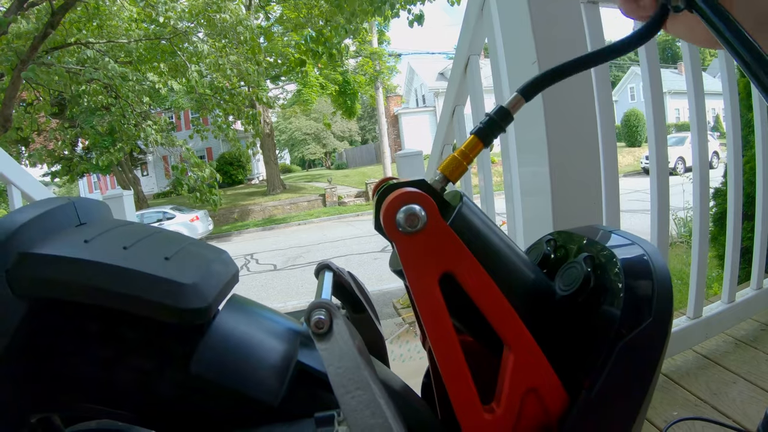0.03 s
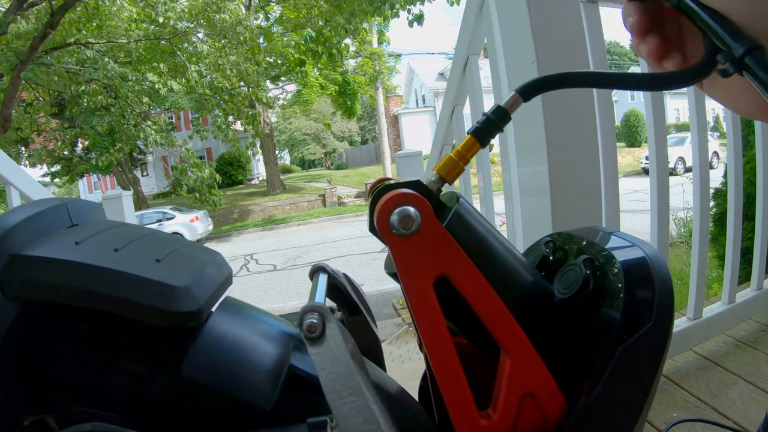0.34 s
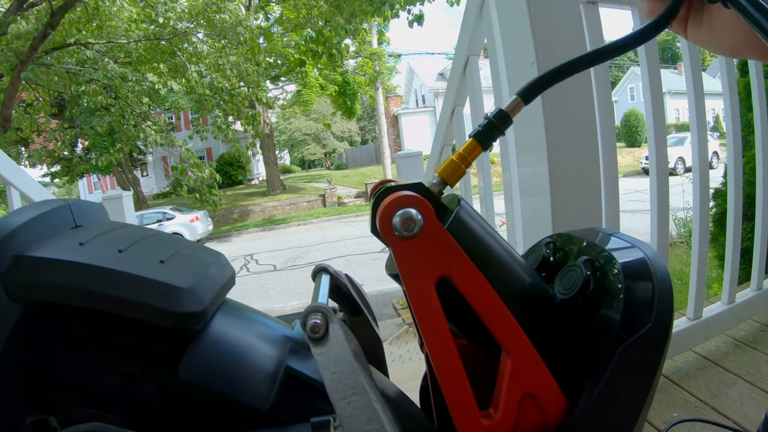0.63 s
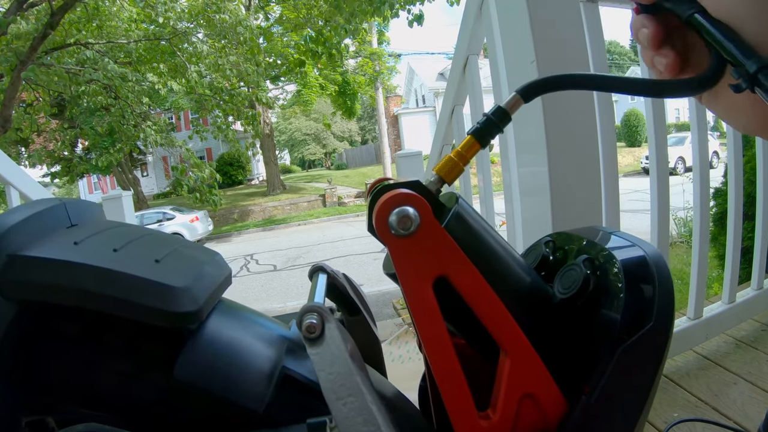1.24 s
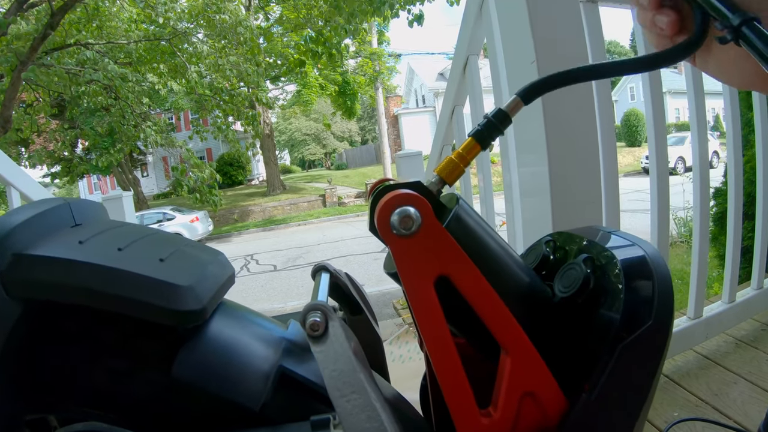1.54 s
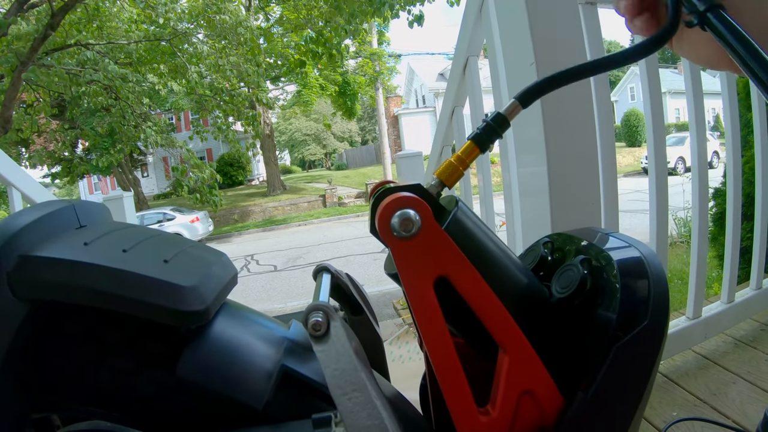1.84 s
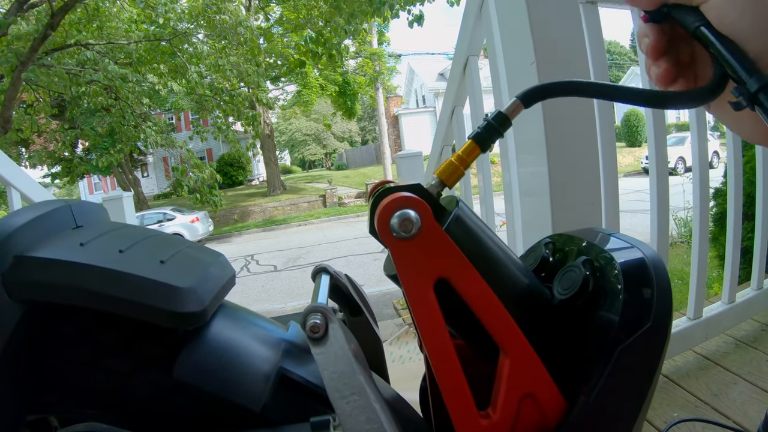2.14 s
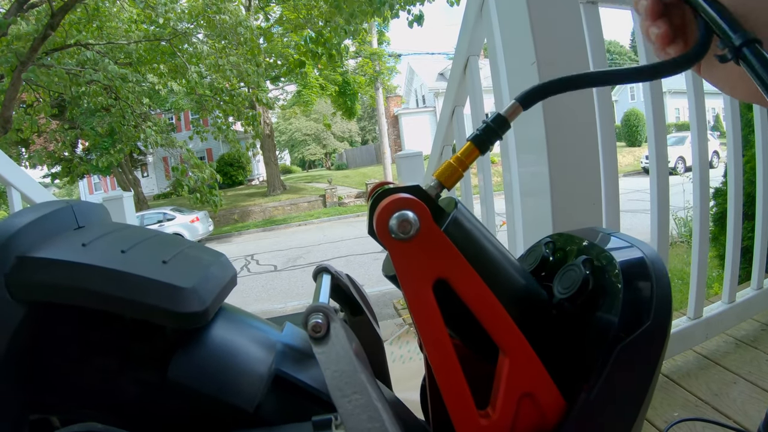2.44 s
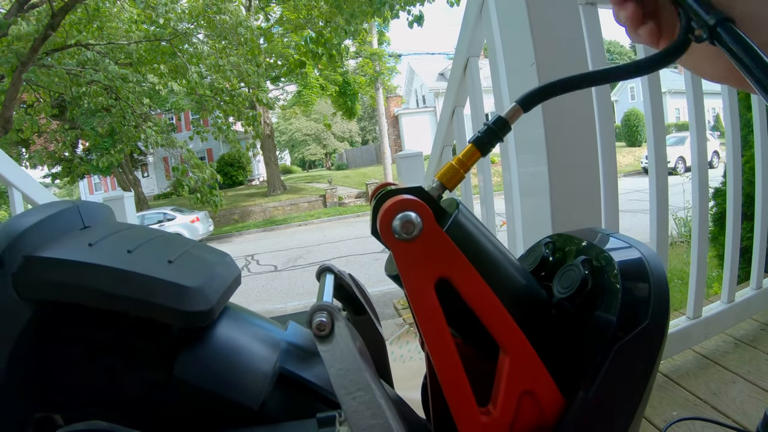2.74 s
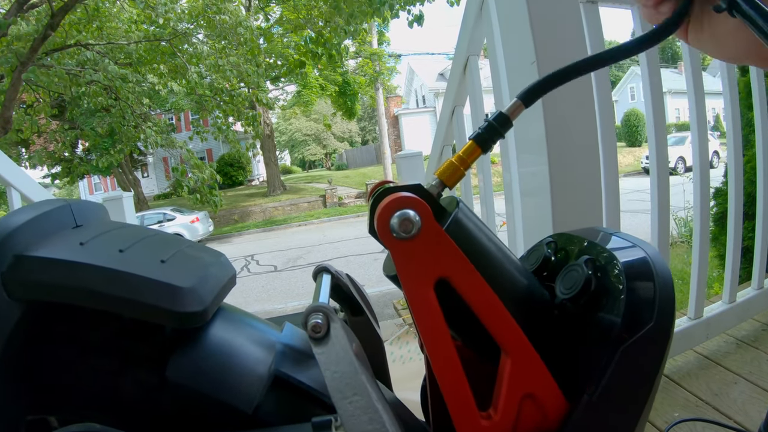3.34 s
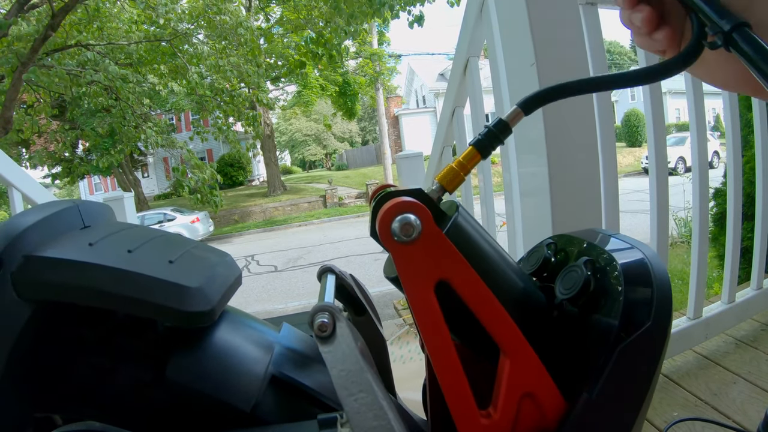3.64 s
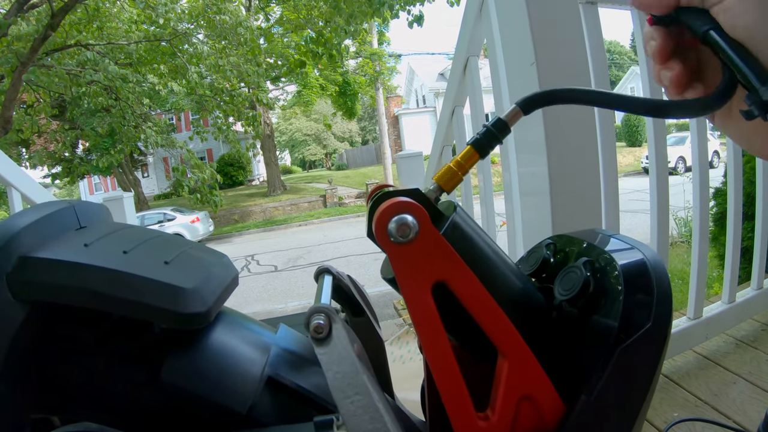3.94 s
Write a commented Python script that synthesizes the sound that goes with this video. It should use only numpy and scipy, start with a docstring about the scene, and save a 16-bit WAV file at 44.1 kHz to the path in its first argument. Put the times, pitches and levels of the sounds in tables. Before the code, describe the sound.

A small hand pump works close by on an open porch. Strokes end in a sharp knock and a brief puff of air at about 0.5, 1.3, 2.2, 3.1 and 4 seconds, the third softest. Between them come light metal clicks, faint seal rubbing and dull hose thuds on a hollow frame. Quiet street rumble continues throughout, with faint birds chirping around 2, 2.7 and 3.7 seconds.

```python
"""An open porch, where a small hand pump feeds a suspension shock through a hose.
Each stroke ends in a knock of the piston and a short puff through the valve. The seal rubs, the metal
barrel clicks, and the hose thuds against the hollow frame on the pull back. Birds call from the trees
over a quiet street and a low machine hum, and the microphone sways slowly."""
import sys
import numpy as np
from scipy import signal
from scipy.fft import rfft, irfft
from scipy.io import wavfile
from scipy.ndimage import uniform_filter1d

SR = 44100
rng = np.random.default_rng(int(sys.argv[2]) if len(sys.argv) > 2 else 0)


def waveform_to_disk(signal):
    """Save audio, clipped to [-1, 1], as 16-bit WAV at the path in sys.argv[1]."""
    frames = np.transpose(np.atleast_2d(signal))
    scaled = np.clip(frames, -1, 1) * 32767
    samples = np.round(scaled).astype(np.int16)
    wavfile.write(sys.argv[1], SR, samples)


N = 176400
T = np.arange(N) / SR
HIT = T[:SR // 5]  # time within one hit
TOP_HZ = 15800

# tone of the street bed: freq_hz, gain_db
STREET_EQ = [(15, -21.5), (30, -21), (45, -21.5), (62, -23.5), (80, -26.5), (110, -30), (145, -31.5),
             (200, -33.5), (300, -41.5), (430, -38.5), (650, -40), (945, -40), (1240, -37), (1950, -43.5),
             (2420, -44), (2770, -47.5), (4700, -50.5), (5700, -55.5), (8800, -60.5), (15500, -63)]
# fader ride on the street's mids as traffic recedes: time_s, gain_db
TRAFFIC_RIDE = [(0, 3), (.8, 1.5), (1.3, 1.5), (1.8, -1), (2.5, -0.5), (3.2, -2), (4, -3)]
# fader ride on the leafy treble: time_s, gain_db
LEAF_RIDE = [(0, 4.5), (.3, -0.5), (.8, 1), (1.15, 1), (1.5, -1), (1.85, 1.5), (2.1, 1), (2.32, -1.5),
             (2.6, 1.5), (3.3, -1), (4, 1)]
# tones of the machine hum: pitch_hz, level_db
HUM_TONES = [(91.5, -66), (118.6, -66), (183, -70.5)]
# harsh calls in short steps: start_s, length_s, start_hz, end_hz, level_db, roughness_ratio
BIRD_SQUAWKS = [(0, 0.011, 2183, 2200, -47.5, 0.13), (0.201, 0.11, 4870, 4400, -65, .05),
                (1.654, 0.069, 2295, 2280, -55.5, 0.17), (1.903, .04, 4440, 4050, -54.5, 0.06),
                (1.938, 0.034, 3700, 3450, -55, 0.07), (1.96, 0.023, 4060, 3750, -60, 0.05),
                (1.966, .032, 3345, 3100, -53, 0.13), (2.009, 0.032, 4600, 4460, -56.5, 0.06),
                (2.655, 0.036, 4680, 4650, -54.5, 0.06), (2.678, 0.043, 4416, 4250, -53, 0.07),
                (2.718, 0.028, 3124, 3450, -50.5, 0.05), (2.728, 0.028, 4550, 4350, -55, 0),
                (2.742, 0.034, 3365, 3050, -58, 0.07), (2.755, 0.048, 4100, 4150, -59, 0.07),
                (2.79, .07, 3640, 3200, -55.5, .05), (3.139, 0.28, 2826, 2717, -64.5, 0.09),
                (3.633, 0.041, 4660, 4600, -60.5, 0.05), (3.65, 0.047, 4320, 4200, -57, 0.06),
                (3.692, 0.051, 3620, 3550, -56.5, 0.06), (3.706, 0.037, 3227, 3050, -52, 0.12),
                (3.834, 0.055, 2850, 2700, -58.5, 0.1)]
# thin far whistles: start_s, length_s, start_hz, end_hz, level_db, arch_hz
BIRD_WHISTLES = [(0.078, 0.039, 4030, 4030, -62.5, 90), (0.271, 0.081, 2353, 2392, -60.5, 193),
                 (0.342, .04, 2470, 2400, -65, -40), (.815, 0.041, 3230, 3160, -66, 28),
                 (1.055, 0.028, 2470, 2400, -61, 34), (1.544, 0.019, 7330, 5800, -64, -100),
                 (2.121, 0.036, 3830, 4180, -63, 35), (2.21, 0.062, 2585, 2470, -59, 354),
                 (3.815, 0.04, 3140, 2970, -58, 27), (3.902, 0.033, 3066, 2990, -59, -23)]
# piston sliding in the barrel: peak_s, level_db, width_s
SEAL_RUBS = [(.19, -60, 0.056), (.7, -66.5, 0.065), (.83, -65.5, 0.073), (1.081, -61.5, 0.048),
             (2.03, -59.5, .03), (2.637, -60.5, 0.028), (2.895, -63, 0.047), (3.45, -65, 0.08),
             (3.765, -63.5, 0.063)]
# tone of the rubbing seal: freq_hz, gain_db
SEAL_EQ = [(500, -24), (1500, -4.5), (2600, 7), (4500, -0.5), (6000, -5), (8000, -7.5), (11000, -22),
           (12600, -20), (14000, -26), (15500, -51)]
# clicks of barrel and handle: start_s, level_db, centre_hz, decay_s
METAL_CLICKS = [(0.37, -49, 4500, 0.0028), (0.433, -52, 2820, 0.0032), (0.4636, -39.5, 5300, 0.0032),
                (0.535, -46, 3700, 0.0057), (0.543, -46, 4050, 0.0023), (0.588, -48.5, 2200, 0.0011),
                (0.6654, -42.5, 2670, 0.0013), (.9259, -43, 6000, 0.0052), (1.095, -47.5, 2580, 0.0023),
                (2.897, -54, 2300, 0.0042), (1.448, -47.5, 4400, 0.0023), (1.575, -43.5, 3230, 0.0016),
                (2.171, -52, 4060, 0.0037), (2.2544, -46, 5000, 0.0021), (2.3535, -46.5, 5240, 0.0023),
                (2.3693, -41, 3970, 0.002), (3.038, -43.5, 2880, 0.0016), (3.1255, -42, 4200, 0.0018),
                (3.198, -49.5, 3500, 0.004), (3.321, -49.5, 2870, 0.0017), (3.909, -54, 5100, 0.0024)]
# tone of metal contact and escaping air: freq_hz, gain_db
RASP_EQ = [(100, 13), (350, -14), (700, -5), (1500, -11), (2300, 1), (3200, 10), (4600, 2), (6000, -2),
           (8000, -2), (11000, -8.5), (16000, -33)]
# ring of the barrel: pitch_hz, gain_db, t60_s
BARREL_MODES = [(1930, -21, 0.012), (3020, 2, 0.034), (3275, -1.5, 0.066), (4280, -0.5, 0.043),
                (4480, -10, 0.0089), (5110, 5, 0.017), (5960, -4.5, 0.025), (6970, 2, 0.025),
                (7710, -13, .018), (11230, -3, 0.019)]
# deep bumps of the handled frame: peak_s, level_db, width_s, pitch_hz
FRAME_BUMPS = [(0.45, -36, 0.043, 28), (0.547, -46, 0.048, 27), (0.65, -47, 0.031, 78),
               (1.342, -42.5, 0.057, 26), (1.45, -42, 0.085, 24), (2.242, -48, 0.031, 32),
               (2.334, -40, .045, 24), (3.11, -43, 0.055, 29), (3.205, -46, 0.046, 24),
               (3.5, -53, 0.024, 95), (3.99, -42, 0.018, 65)]
# ends of the strokes: start_s, knock_db, puff_db, puff_length_s, spit_db
STROKE_ENDS = [(0.4541, -25, -49, 0.012, -66), (1.3323, -29.5, -50.5, 0.015, -51.5),
               (2.2423, -33.5, -52.5, 0.0064, -57.5), (3.1019, -26.5, -48, 0.012, -58),
               (3.9831, -22.5, -45.5, 0.01, -51)]
# pump body under the knock: pitch_hz, gain_db, t60_s
BODY_MODES = [(171, -13, 0.0206), (380, -3, 0.0043), (704, -9.5, 0.011), (1283, 1.5, 0.0074),
              (1930, 2.5, 0.0038), (2920, -12, 0.006)]
# tone of the puff's bright spit: freq_hz, gain_db
SPIT_EQ = [(2000, -45), (5000, -19), (6800, 6.5), (8500, 5.5), (10500, -13.5), (12500, -12.5), (16000, -12)]
# dull thuds of hose and frame: start_s, level_db, decay_s
HOSE_THUDS = [(.456, -51.5, 0.0093), (.539, -56, 0.0081), (.604, -51, 0.0092), (0.6146, -47.5, 0.042),
              (.664, -48, 0.0052), (.927, -49, 0.0092), (1.335, -48, 0.014), (1.393, -49.5, 0.024),
              (1.917, -63, 0.0094), (2.244, -45.5, 0.0065), (2.338, -52, 0.047), (2.365, -43.5, 0.0076),
              (2.98, -53, .012), (3.3216, -44.5, 0.0029), (3.5006, -43, 0.0072), (3.526, -42.5, 0.014)]
# ring of hose and frame: pitch_hz, gain_db, t60_s
FRAME_MODES = [(341, -9.5, 0.042), (600, -4.5, 0.028), (650, -17, 0.027), (766, -3.5, 0.02), (895, -6, .05),
               (1063, -4, 0.021), (1510, 7.5, 0.0057)]
# broad tone of hose and frame: freq_hz, gain_db
FRAME_EQ = [(40, -14), (120, 1), (300, 0.5), (650, 0), (1000, -9), (1600, -4.5), (2500, -5), (5000, -21),
            (12000, -50)]
# light taps of piston and valve: start_s, level_db, pitch_hz, upper_hz
VALVE_TAPS = [(.4635, -31, 3170, 4570), (.9256, -32, 2060, 3550), (.9262, -34.5, 4630, 4900),
              (1.3402, -38, 4000, 6630), (1.3447, -36, 2980, 4270), (1.575, -35, 3040, 3700),
              (2.2455, -55, 4560, 7300), (2.2552, -44, 3300, 4770), (2.369, -41, 2300, 2870),
              (3.038, -32, 2250, 2950), (3.1029, -41, 2830, 3400), (3.1107, -40.5, 4200, 7630)]
# firm knocks on the hollow frame: start_s, knock_db, hollow_hz, hollow_db
HOLLOW_KNOCKS = [(.603, -54, 666, -39.5), (.6122, -42, 1640, -45.5), (.6135, -45, 587, -38),
                 (.6205, -65, 730, -41), (.6265, -61, 560, -53), (.6652, -53, 363, -44.5),
                 (.931, -59, 615, -41.5), (1.3345, -53, 773, -43), (2.244, -49, 774, -45),
                 (2.338, -52, 620, -42), (2.346, -56, 750, -48), (2.3645, -46, 1500, -50),
                 (2.368, -65, 570, -38), (2.37, -55, 920, -44), (3.038, -54, 805, -48),
                 (3.321, -46, 793, -52), (3.5007, -42, 650, -37), (3.505, -54, 1200, -41),
                 (3.508, -58, 350, -51), (3.5262, -48, 1600, -42), (3.534, -57, 580, -51)]
# swells of thin, very high hiss: peak_s, level_db, width_s
SIZZLE_SWELLS = [(1.75, -81, 0.065), (2.02, -77, 0.046), (2.62, -78, 0.06), (2.85, -72, 0.034),
                 (3.45, -74, 0.055), (3.77, -71.5, .06)]
# tone of that hiss: freq_hz, gain_db
SIZZLE_EQ = [(8000, -38), (11300, -10), (12550, 8), (13700, -8), (15300, -3), (16500, -3)]


def undb(db):
    """Decibels to gain."""
    return 10 ** (np.asarray(db) / 20)


def unit(x):
    """Scale to rms 1."""
    return x / np.sqrt(np.mean(x ** 2) + 1e-30)


def add(out, start_s, x):
    """Mix x in at its cue."""
    i = int(np.clip(round(start_s * SR), 0, N - 1))
    out[i:i + len(x)] += x[:N - i]


def drift(rate_hz):
    """Smooth random modulation, rms 1."""
    hold = int(SR / rate_hz)
    steps = rng.standard_normal(N)[np.arange(N) // hold]
    return unit(uniform_filter1d(uniform_filter1d(steps, hold), hold))


def tone(hz):
    """A sine that follows a pitch curve."""
    return np.sin(2 * np.pi * np.cumsum(hz) / SR)


def butter(order, hz, kind="lowpass"):
    """Filter sections for a smooth roll-off."""
    return signal.butter(order, hz, kind, fs=SR, output="sos")


def convolve(x, response):
    """Play x through an impulse response at unit power gain."""
    return signal.fftconvolve(x, response / np.linalg.norm(response))[:len(x)]


def eq(x, curve):
    """Minimum-phase EQ along a curve, at unit power gain."""
    hz, db = np.array(curve).T
    size = 8192
    gain = undb(np.interp(np.log(np.fft.rfftfreq(size, 1 / SR) + 1), np.log(hz), db))
    cepstrum = irfft(np.log(gain))
    cepstrum[1:size // 2] *= 2  # folded forward, so nothing rings ahead of a hit
    cepstrum[size // 2 + 1:] = 0
    return convolve(x, irfft(np.exp(rfft(cepstrum))))


def modes(table, wave=np.sin):
    """Damped partials of a struck object."""
    return sum(undb(db) * wave(2 * np.pi * hz * HIT) * np.exp(-np.log(1000) * HIT / t60)
               for hz, db, t60 in table)


def burst(x, envelope):
    """Give x the energy of unit noise under this envelope."""
    return x * np.linalg.norm(envelope) / np.linalg.norm(x)


def reverb(x, t60_s, wet_db):
    """Add a diffuse, slightly dull tail."""
    t = T[:SR]
    wash = signal.sosfilt(butter(1, 5000), rng.standard_normal(SR))
    tail = wash * np.exp(-np.log(1000) * t / t60_s) * np.minimum(t / 0.0054, 1)
    return x + undb(wet_db) * convolve(x, tail)


def swells(table, curve):
    """Fluttering hiss that rises and falls once for each row."""
    envelope = sum(undb(db) * np.exp(-.5 * ((T - peak_s) / width_s) ** 2)
                   for peak_s, db, width_s in table)
    flutter = undb(1.5 * drift(120))
    return envelope * flutter * eq(rng.standard_normal(N), curve)


def street():
    """A noise bed in three bands: swelling rumble, receding traffic and leaves on top."""
    bed = undb(-54.5) * unit(eq(rng.standard_normal(N + SR), STREET_EQ)[SR:])
    low = signal.sosfiltfilt(butter(2, 350), bed)
    high = signal.sosfiltfilt(butter(2, 2500, "highpass"), bed)
    traffic = (bed - low - high) * undb(np.interp(T, *np.array(TRAFFIC_RIDE).T) + .5 * drift(15))
    rumble = low * undb(1.5 * drift(4.93))
    leaves = high * undb(np.interp(T, *np.array(LEAF_RIDE).T) + .5 * drift(6.9))
    return rumble + traffic + leaves


def machine_hum():
    """Low tones, each wavering in level and pitch."""
    return sum(undb(db + 1.48 * drift(3)) * np.sqrt(2) * tone(hz * (1 + 0.01223 * drift(9)))
               for hz, db in HUM_TONES)


def mic_sway(rate_hz=2.7, level_db=-32.7):
    """The microphone rocks, far below hearing."""
    phase = 2 * np.pi * rate_hz * T + .6 * drift(2)
    return undb(level_db) * np.sqrt(2) * np.sin(phase)


def bird_note(length_s, start_hz, end_hz, db, roughness, arch_hz):
    """One gliding note, roughened by a fast pitch flutter."""
    progress = np.minimum(T[:SR // 2] / length_s, 1)
    flutter = unit(signal.sosfilt(butter(2, 400), rng.standard_normal(len(progress))))
    glide_hz = start_hz + (end_hz - start_hz) * progress + arch_hz * np.sin(np.pi * progress)
    envelope = 2 * np.sqrt(progress * (1 - progress))
    return undb(db) * envelope * tone(glide_hz * (1 + roughness * flutter))


def birds():
    """Rough stepped calls and clean arched whistles, echoed by the trees."""
    out = np.zeros(N)
    for start_s, *note in BIRD_SQUAWKS:
        add(out, start_s, bird_note(*note, arch_hz=0))
    for start_s, *note, arch_hz in BIRD_WHISTLES:
        add(out, start_s, bird_note(*note, roughness=.011, arch_hz=arch_hz))
    return reverb(out, t60_s=.33, wet_db=-3)


def seal_rub():
    """The piston seal rubs faintly as it slides."""
    return swells(SEAL_RUBS, SEAL_EQ)


def barrel(drive, ring_db):
    """Air or contact rasps and rings the barrel, its modes detuned a little each time."""
    detuned = [(hz * (1 + .025 * rng.standard_normal()), db, t60) for hz, db, t60 in BARREL_MODES]
    return eq(drive, RASP_EQ) + undb(ring_db) * convolve(drive, modes(detuned))


def metal_clicks():
    """Loose metal chatters for milliseconds; each contact favours two octaves of the barrel's ring."""
    out = np.zeros(N)
    for start_s, db, centre_hz, decay_s in METAL_CLICKS:
        envelope = np.exp(-HIT / decay_s)
        metal = barrel(envelope * rng.laplace(size=len(HIT)), ring_db=-5.5)
        band = butter(1, [centre_hz / 2, min(centre_hz * 2, TOP_HZ)], "bandpass")
        add(out, start_s, undb(db) * burst(signal.sosfilt(band, metal), envelope))
    return out


def frame_bumps():
    """The frame rocks in soft, deep bumps of unsteady pitch."""
    return sum(undb(db) * np.exp(-((T - peak_s) / width_s) ** 2) * tone(hz * (1 + 0.15 * drift(67)))
               for peak_s, db, width_s, hz in FRAME_BUMPS)


def piston_knocks(contact_s=.00009, chatter_s=0.0051, chatter_db=-14.5):
    """The piston bottoms out, knocks the pump body and chatters on its stop."""
    out = np.zeros(N)
    impact = np.exp(-.5 * (HIT / contact_s - np.e) ** 2)
    knock = -convolve(impact, modes(BODY_MODES, np.cos))
    knock /= np.abs(knock).max()
    fade = np.exp(-HIT / chatter_s)
    for start_s, knock_db, *_ in STROKE_ENDS:
        chatter = convolve(fade * rng.standard_normal(len(HIT)), modes(BODY_MODES))
        add(out, start_s, undb(knock_db) * (knock + undb(chatter_db) * burst(chatter, fade)))
    return out


def valve_puffs(delay_s=0.000933, attack_s=0.00027, release_s=.0055):
    """Just behind each knock, air puffs through the valve, rings the barrel and spits brightly."""
    out = np.zeros(N)
    for start_s, _, puff_db, length_s, spit_db in STROKE_ENDS:
        envelope = np.minimum(HIT / attack_s, 1) * np.exp(-np.maximum(HIT - length_s, 0) / release_s)
        puff = burst(barrel(envelope * rng.laplace(size=len(HIT)), ring_db=-4), envelope)
        jet = np.exp(-(HIT / length_s - .7) ** 2 / 0.12) * envelope  # peaks late in the puff
        sputter = undb(3.3 * drift(730)[:len(HIT)])
        spit = burst(eq(jet * sputter * rng.laplace(size=len(HIT)), SPIT_EQ), jet)
        add(out, start_s + delay_s, undb(puff_db) * puff + undb(spit_db) * spit)
    return out


def hose_thuds(ring_db=0.5):
    """The hose tugs at the frame with a dull rattle."""
    out = np.zeros(N)
    for start_s, db, decay_s in HOSE_THUDS:
        envelope = np.exp(-HIT / decay_s)
        tug = envelope * rng.laplace(size=len(HIT))
        rattle = eq(tug, FRAME_EQ) + undb(ring_db) * convolve(tug, modes(FRAME_MODES))
        add(out, start_s, undb(db) * burst(rattle, envelope))
    return out


def valve_taps(t60_s=0.0095, attack_s=.0004):
    """Piston and valve tap lightly, each tap a tiny ping of two partials."""
    out = np.zeros(N)
    for start_s, db, hz, upper_hz in VALVE_TAPS:
        ping = modes([(hz, db, t60_s), (upper_hz, db - 3, t60_s)])
        add(out, start_s, ping * np.minimum(HIT / attack_s, 1))
    return out


def frame_knocks(hollow_t60_s=0.032, hollow_attack_s=0.0011):
    """Firm knocks strike the frame's modes, and a hollow note blooms with each."""
    out = np.zeros(N)
    for start_s, knock_db, hollow_hz, hollow_db in HOLLOW_KNOCKS:
        detuned = [(hz * (1 + 0.046 * rng.standard_normal()), db, t60) for hz, db, t60 in FRAME_MODES]
        knock = modes(detuned)
        hollow = modes([(hollow_hz, hollow_db, hollow_t60_s)]) * np.minimum(HIT / hollow_attack_s, 1)
        add(out, start_s, undb(knock_db) * knock / np.abs(knock).max() + hollow)
    return out


def sizzle():
    """A thin, very high hiss comes and goes."""
    return swells(SIZZLE_SWELLS, SIZZLE_EQ)


def scene():
    """The pump close by under the porch roof, birds and street beyond, in mono."""
    pump = seal_rub() + metal_clicks() + piston_knocks() + valve_puffs() + valve_taps() + sizzle()
    frame = frame_bumps() + hose_thuds() + frame_knocks()
    porch = reverb(pump + frame, t60_s=0.12, wet_db=-15)
    return (porch + street() + machine_hum() + mic_sway() + birds())[None]


def record(dry):
    """A steep high cut takes off the very top."""
    return signal.sosfilt(signal.ellip(10, .2, 70, TOP_HZ, fs=SR, output="sos"), dry)


dry = scene()
out = record(dry)
waveform_to_disk(out)
```